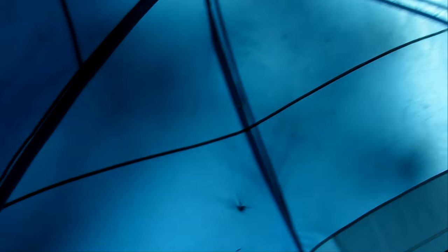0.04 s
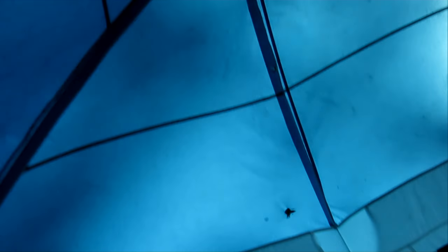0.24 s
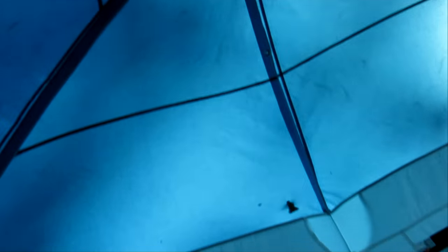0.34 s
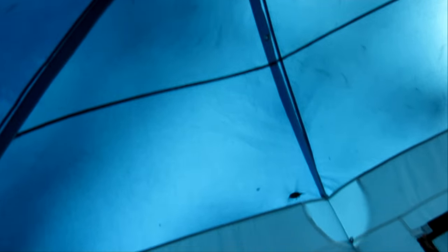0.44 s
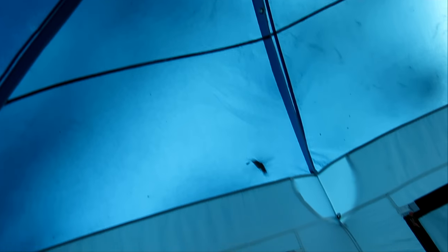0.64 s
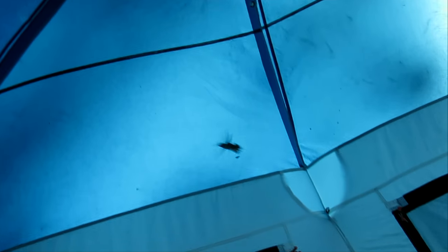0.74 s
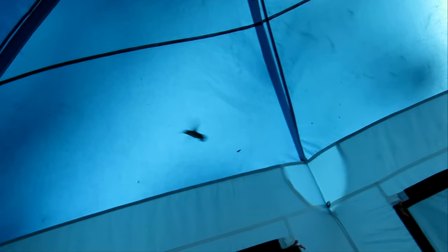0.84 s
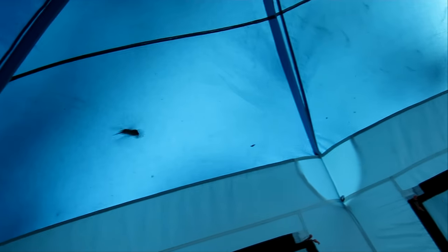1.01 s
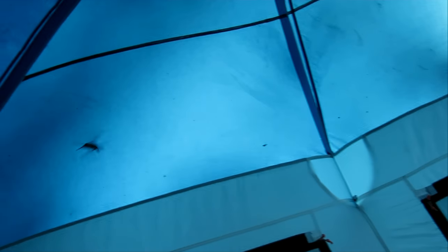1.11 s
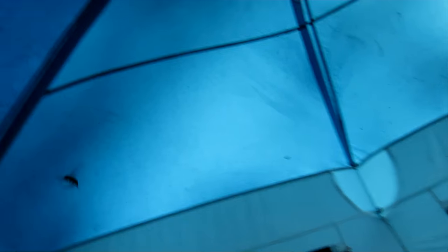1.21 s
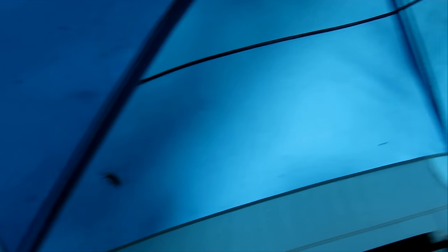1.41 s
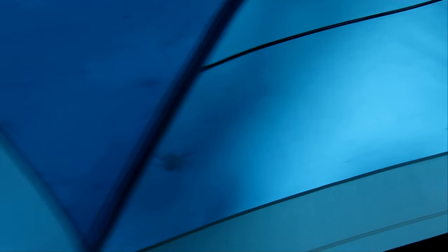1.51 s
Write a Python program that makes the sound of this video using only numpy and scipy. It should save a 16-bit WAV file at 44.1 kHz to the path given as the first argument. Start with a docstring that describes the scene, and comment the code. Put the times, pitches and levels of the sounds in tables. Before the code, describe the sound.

One crisp tap, slightly overloading the close microphone, then a softer, dull knock inside a tent. Faint cloth rustling, light handling bumps and a few small ticks sit over quiet outdoor air and a faint low hum.

```python
"""Inside a tent, close to a hand-held microphone: one sharp, dry tap, then a weaker, duller knock.
These, the soft handling bumps and a few tiny ticks are impacts that ring briefly,
scattered faintly by the cloth walls. The tap adds a crack of noise and just overloads the recorder.
Fabric rustles in short swells, over a quiet outdoor hush and a faint low hum."""
import sys
import numpy as np
from scipy import signal
from scipy.fft import rfft, irfft
from scipy.io import wavfile
from scipy.ndimage import uniform_filter1d

SR = 44100
rng = np.random.default_rng(int(sys.argv[2]) if len(sys.argv) > 2 else 0)


def persist_wave(psi):
    """Save psi, clipped to +-1, as 16-bit WAV."""
    counts = np.round(np.clip(psi, -1, 1) * 32767).astype(np.int16)
    wavfile.write(sys.argv[1], SR, np.atleast_2d(counts).T)


N = 68355
TIME, FREQS = np.arange(N) / SR, np.fft.rfftfreq(N, 1 / SR)


def amp(db):
    """Amplitude grows tenfold every 20 dB."""
    return 10 ** (np.asarray(db) / 20)


def unit(x):
    """Normalisation to an rms of one."""
    return x / np.sqrt(np.mean(x ** 2) + 1e-20)


def at_hz(points, hz):
    """Interpolation on a log-frequency axis."""
    f, value = np.transpose(points)
    return np.interp(np.log(hz + 1), np.log(f + 1), value)


def envelope(points):
    """Interpolation in dB gives a gain for every sample."""
    return amp(np.interp(TIME, *np.transpose(points)))


def pan(db):
    """A level difference, left over right, sets direction."""
    return amp([[db / 2], [-db / 2]])


def decay(t, t60):
    """Exponential damping: 60 dB lost in t60 seconds."""
    return np.exp(-np.log(1000) * t / t60)


def drift(step_s):
    """Low-passed noise changes about once per step."""
    return unit(irfft(rfft(rng.standard_normal(N)) * np.exp(-(2 * FREQS * step_s) ** 2), N))


# Each row: frequency in Hz, left-right correlation from -1 to 1.
CORRELATION = [(60, 1), (130, 0.95), (250, 0.19), (380, -0.11), (700, 0.28), (1400, 0.79), (3100, 0.83),
               (6800, 0.87), (8500, 0.36), (10500, -0.96), (15000, -0.28)]
def stereo_noise(spectrum, mids_db_per_s=0):
    """Partial coherence: both channels share some of a coloured noise, whose middle range may fade."""
    hz = np.fft.rfftfreq(2048, 1 / SR)
    a, b, c, d, patches = rng.standard_normal((N // 512 + 5, len(hz), 5)).T
    patches = uniform_filter1d(patches, size=20, axis=0)
    patch_db = 1.44 * unit(uniform_filter1d(patches, size=6, axis=1))  # faint drifts of colour
    shared = np.clip(at_hz(CORRELATION, hz), -1, 1)[:, None]
    left = a + 1j * b
    right = shared * left + np.sqrt(1 - shared ** 2) * (c + 1j * d)
    mids = np.exp(-np.log2((hz[:, None] + 1) / 730) ** 2)  # a band around 730 Hz
    fade_db = mids_db_per_s * mids * np.linspace(-.5, .5, a.shape[1]) * N / SR
    frames = np.array([left, right]) * amp(at_hz(spectrum, hz)[:, None] + patch_db + fade_db)
    return unit(signal.istft(frames, nperseg=2048, noverlap=1536)[1][:, :N])


# Colour of the hush. Each row: frequency in Hz, relative spectral density in dB.
HUSH_SPECTRUM = [(25, -42), (66, -14), (110, -8.5), (144, -11), (190, -10), (280, -10.5), (445, -13),
                 (666, -19), (850, -18.5), (1400, -21), (3800, -26.5), (7500, -35), (9500, -38.5),
                 (11000, -40), (12400, -46), (15500, -36)]
# Its envelope. Each row: time in seconds, level in dB.
HUSH_ENVELOPE = [(0, -44), (0.2, -43.5), (0.3, -45.5), (0.45, -45), (0.75, -44.5), (1.1, -45.5),
                 (1.55, -43.5)]
def hush():
    """Broadband ambient noise from outdoors slowly thins in its middle range."""
    return envelope(HUSH_ENVELOPE) * stereo_noise(HUSH_SPECTRUM, mids_db_per_s=-1.6)


# Envelope of the hum. Each row: time in seconds, level in dB.
HUM_ENVELOPE = [(0, -58.5), (0.5, -68.5), (0.7, -52.5), (0.95, -53), (1.3, -52), (1.55, -52.5)]
def hum(pitch_hz=247.4, waver=0.0032):
    """Random frequency modulation makes one low tone waver slightly."""
    cycles = np.cumsum(pitch_hz * (1 + waver * drift(step_s=0.047))) / SR
    return pan(-2) * envelope(HUM_ENVELOPE) * unit(np.sin(2 * np.pi * cycles))


def strike(blows, partials, attack_s, low_cut_hz, left_lag_s, pan_db):
    """Impulse response: each blow starts a sum of damped sinusoids with little bass."""
    t = np.maximum(np.arange(SR // 4) / SR - np.array([[left_lag_s], [0]]), 0)
    ring = sum(amp(db) * decay(t, t60) * np.sin(2 * np.pi * hz * t) for hz, db, t60 in partials)
    ring *= 1 - np.exp(-(t / attack_s) ** 2)
    ring = signal.sosfilt(signal.butter(2, low_cut_hz, "high", fs=SR, output="sos"), ring)
    force = np.zeros((1, N))
    for start, db in blows:
        force[0, round(start * SR)] += amp(db)
    return pan(pan_db) * signal.fftconvolve(force, ring, axes=1)[:, :N]


# Handling impacts. Each row: start in seconds, level in dB.
BUMP_BLOWS = [(0.027, -31.5), (0.4245, -31), (0.5517, -23), (0.5580, -28.5)]
# Their modes. Each row: frequency in Hz, relative level in dB, 60 dB decay time in seconds.
BUMP_RESONANCES = [(126, -10, 0.076), (281, 3.5, 0.024), (359, -5.5, 0.032), (505, -0.5, 0.024)]
def bumps():
    """Soft impacts from handling excite only low modes."""
    return strike(BUMP_BLOWS, BUMP_RESONANCES, attack_s=.0016, low_cut_hz=90, left_lag_s=2e-4, pan_db=3)


def tent_scatter(sound, t60_s=.06, rise_s=.0072, top_hz=3500):
    """Diffuse reflection: the cloth walls return a weak, dull, very short tail."""
    t = np.arange(SR // 4) / SR
    tail = rng.standard_normal((2, len(t))) * decay(t, t60_s) * np.minimum(t / rise_s, 1) ** 2
    tail = signal.lfilter(*signal.butter(2, top_hz, fs=SR), tail / np.linalg.norm(tail[0]))
    return amp(-22) * signal.fftconvolve(sound, tail, axes=1)[:, :N]


# Brushes of fabric. Each row: centre in seconds, length in seconds, level in dB.
BRUSHES = [(0.035, 0.023, -47.5), (0.184, 0.011, -66), (0.38, 0.023, -44), (0.5, 0.016, -43),
           (0.523, 0.015, -48.5), (0.632, 0.027, -45.5), (0.683, 0.037, -47.5), (1.466, 0.024, -49)]
# Their colour. Each row: frequency in Hz, relative spectral density in dB.
FABRIC_SPECTRUM = [(100, -30), (450, 4), (1000, 1), (1700, 3.5), (3000, -4), (5000, -10), (8000, -19.5),
                   (15000, -51)]
def rustle(grain_db=2):
    """Friction of brushing fabric gives short swells of grainy noise."""
    swell = sum(amp(db) * np.exp(-2 * ((TIME - centre) / length) ** 2) for centre, length, db in BRUSHES)
    return swell * unit(stereo_noise(FABRIC_SPECTRUM) * amp(grain_db * drift(step_s=.0015)))


# The sharp impact. Each row: start in seconds, level in dB.
TAP_BLOWS = [(0.2206, -0.64)]
# Its mid-range modes and harsh treble overtones.
# Each row: frequency in Hz, relative level in dB, 60 dB decay time in seconds.
TAP_PARTIALS = [(372, -19, 0.055), (509, -12.5, 0.067), (584, -9, 0.033), (1060, -19.5, 0.04),
                (1128, -10, 0.031), (1357, 2.5, 0.015), (1807, -2.5, 0.022), (2042, -3, 0.023),
                (2545, -8, 0.018), (2784, -17.5, 0.022), (3687, -13, 0.0125), (4497, -15, 0.015),
                (5200, -21.5, 0.016), (6346, -18, 0.0087), (7060, -3.5, 0.0043), (11650, -13.5, .006),
                (12270, -2.5, 0.0073)]
# Colour of its crack. Each row: frequency in Hz, relative spectral density in dB.
CRACK_SPECTRUM = [(200, -8), (380, 12), (800, -12), (3000, 3), (7500, -4.5), (8700, -10.5), (10400, -9),
                  (11300, -3), (12800, -10), (14500, -28)]
def tap(left_lag_s=3.5e-5, crack_db=-18.5, crack_rise_s=.0004):
    """The tap rings in mid-range modes, with harsh treble overtones like an overloaded recorder's
    and a crack of bright noise."""
    ring = strike(TAP_BLOWS, TAP_PARTIALS, attack_s=.0014, low_cut_hz=1127,
                  left_lag_s=left_lag_s, pan_db=-1.4)
    burst = np.zeros(N)
    for start, db in TAP_BLOWS:
        age = np.maximum(TIME - start, 0)
        burst += amp(db + crack_db) * (1 - np.exp(-(age / crack_rise_s) ** 2)) * decay(age, t60=.019)
    colour = unit(amp(at_hz(CRACK_SPECTRUM, FREQS)))
    delay = np.exp(-2j * np.pi * FREQS * np.array([[left_lag_s], [0]]))
    crack = irfft(rfft(burst * rng.standard_normal(N)) * colour * delay, N)
    return ring + crack


# The duller impact. Each row: start in seconds, level in dB.
KNOCK_BLOWS = [(0.36585, -0.5)]
# Its modes. Each row: frequency in Hz, relative level in dB, 60 dB decay time in seconds.
KNOCK_RESONANCES = [(1043, -33, 0.049), (1400, -22, 0.029), (1554, -11.5, 0.015), (1614, -25.5, 0.048),
                    (1702, -26, 0.076), (2184, -35, 0.018)]
def knock():
    """Free vibration in mid-range modes alone sounds duller than the tap."""
    return strike(KNOCK_BLOWS, KNOCK_RESONANCES, attack_s=.0016, low_cut_hz=100,
                  left_lag_s=1e-5, pan_db=3)


# Tiny impacts. Each row: start in seconds, level in dB.
TICK_BLOWS = [(0.5100, -27), (0.5430, -28), (0.6328, -28), (1.4415, -29), (1.4692, -21), (1.4741, -19.5)]
# Their modes. Each row: frequency in Hz, relative level in dB, 60 dB decay time in seconds.
TICK_RESONANCES = [(1410, -6, 0.0052), (2550, 1.5, 0.0025), (4700, -6, 0.0025)]
def ticks():
    """Heavy damping ends each dry tick within milliseconds."""
    return strike(TICK_BLOWS, TICK_RESONANCES, attack_s=.00018, low_cut_hz=510,
                  left_lag_s=4e-6, pan_db=1.5)


def scene():
    """Linear superposition of the impacts, their reflections, rustle, hum and hush."""
    impacts = bumps() + tap() + knock() + ticks()
    return impacts + tent_scatter(impacts) + rustle() + hum() + hush()


def record(dry):
    """Saturation rounds the tap's peak; low-pass filters roll off the top treble and end the band."""
    ceiling, roll_off_hz, edge_hz = .64, 13300, 15700
    clipped = dry / (1 + (dry / ceiling) ** 8) ** (1 / 8)
    softened = signal.sosfilt(signal.butter(8, roll_off_hz, fs=SR, output="sos"), clipped)
    band_limit = signal.firwin(511, edge_hz, window=("kaiser", 9), fs=SR)
    return signal.oaconvolve(softened, band_limit[None], "same")


dry = scene()
out = record(dry)
persist_wave(out)
```